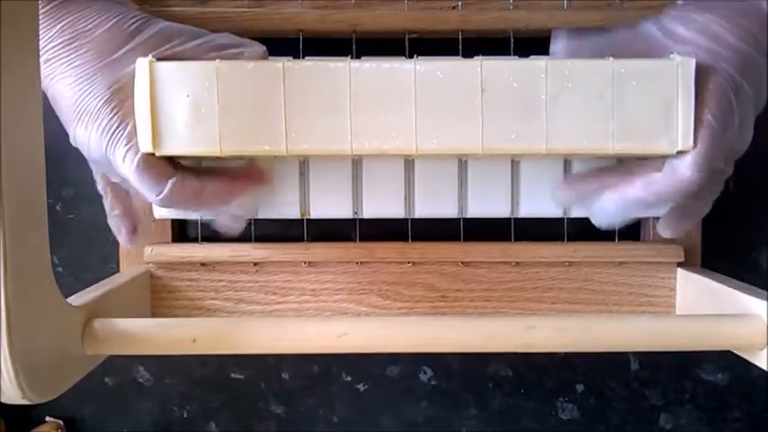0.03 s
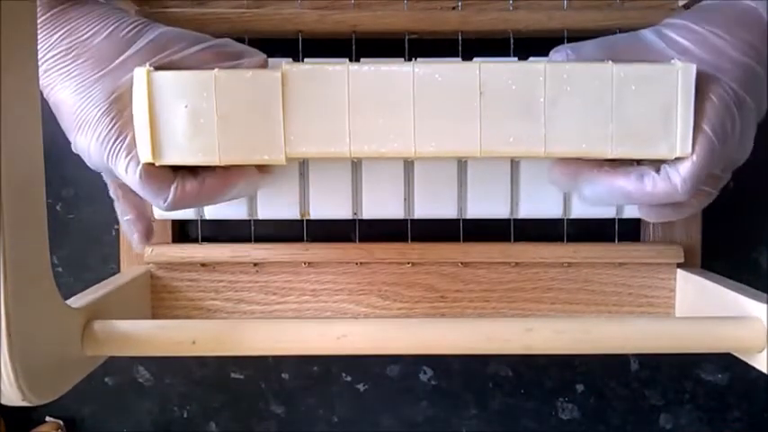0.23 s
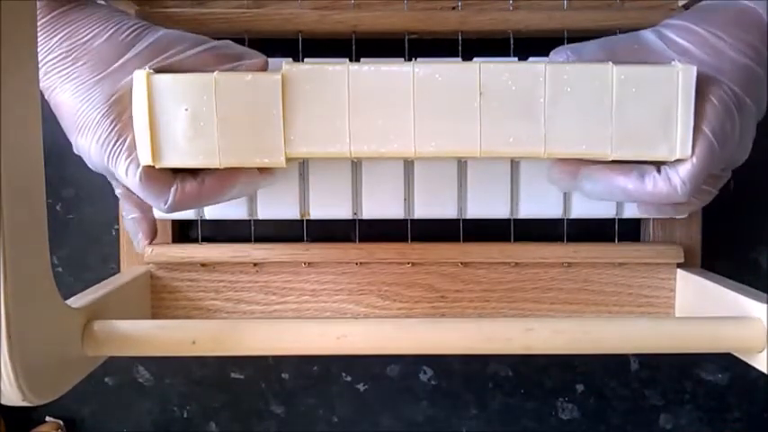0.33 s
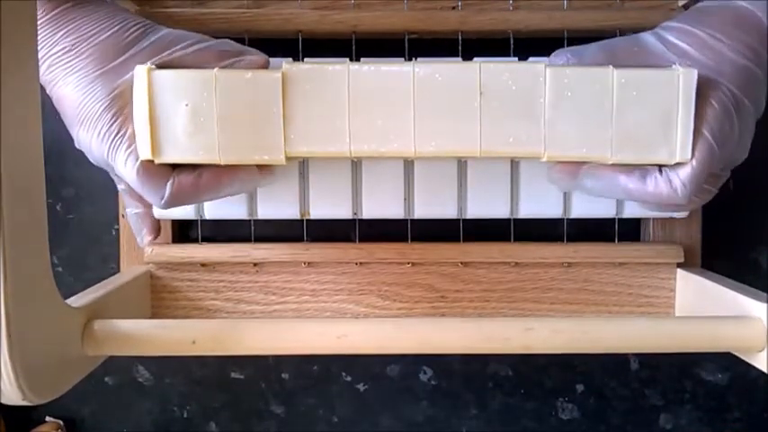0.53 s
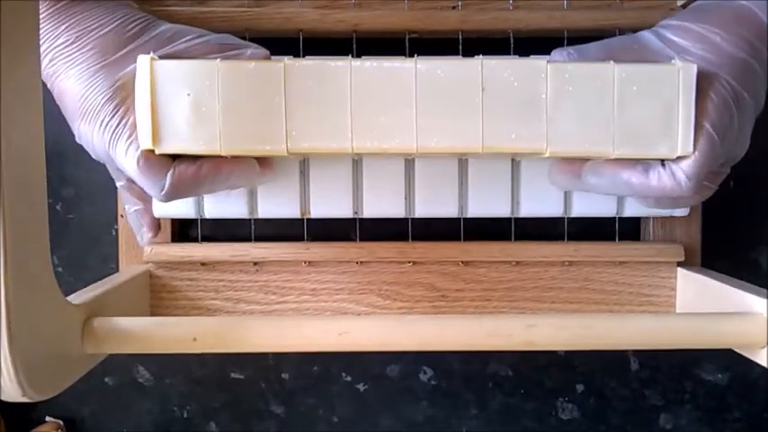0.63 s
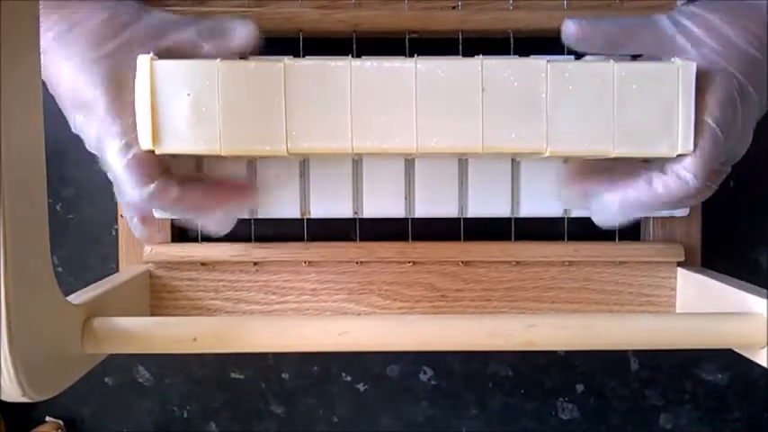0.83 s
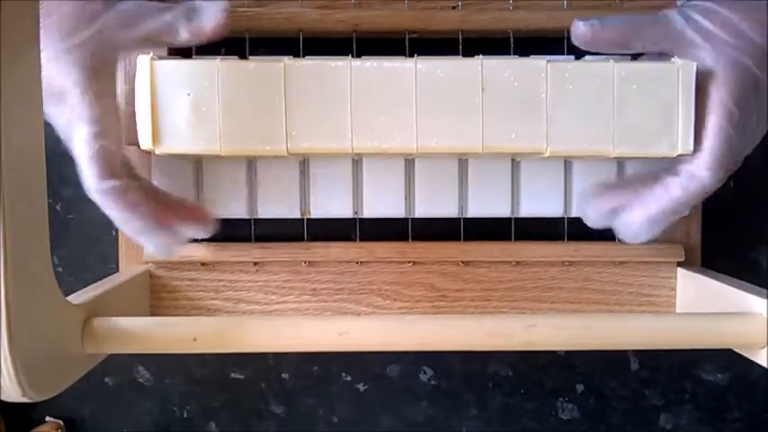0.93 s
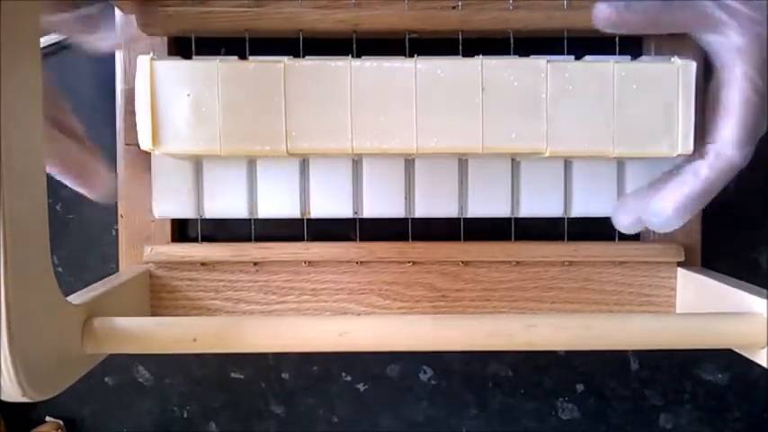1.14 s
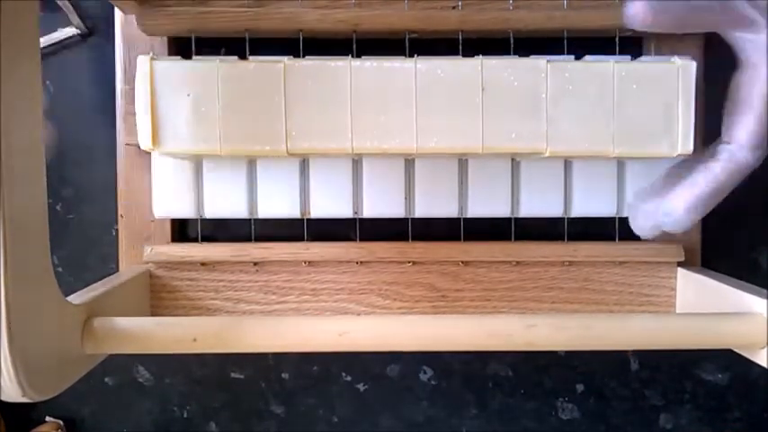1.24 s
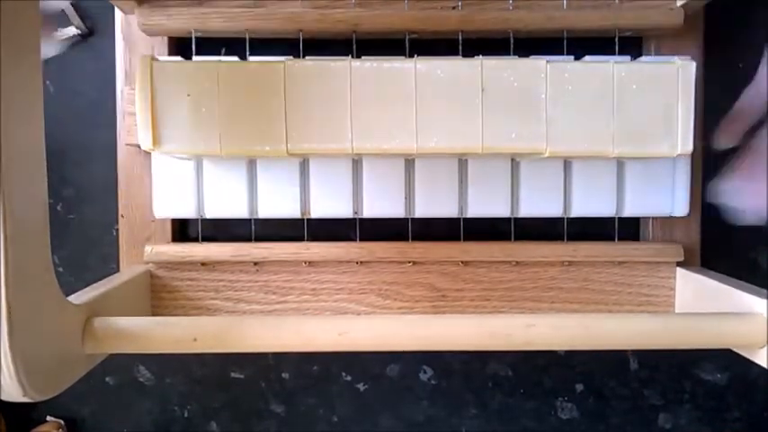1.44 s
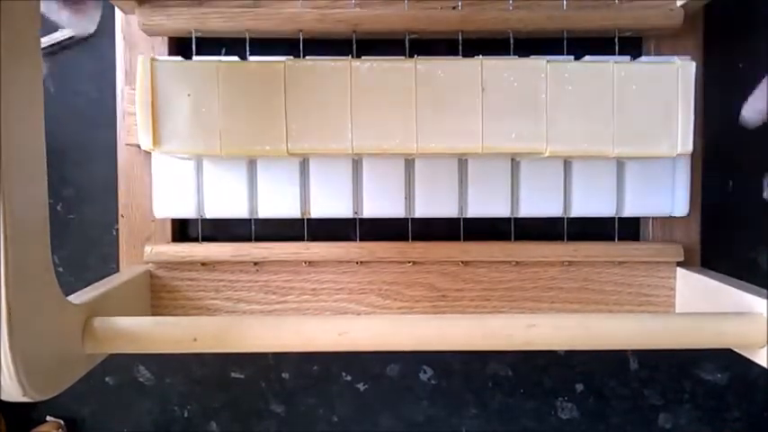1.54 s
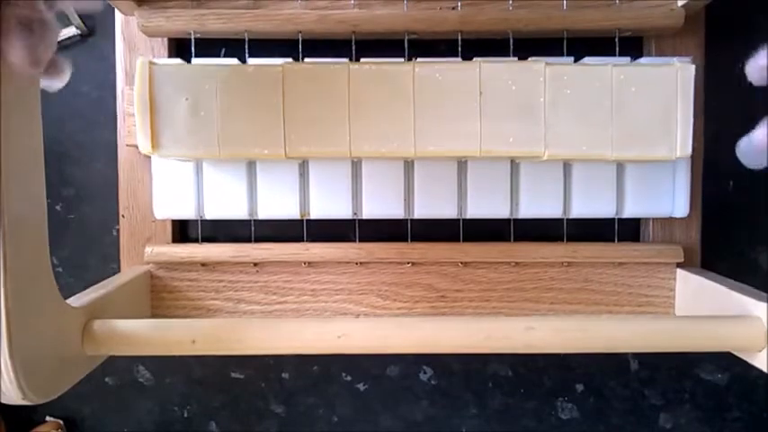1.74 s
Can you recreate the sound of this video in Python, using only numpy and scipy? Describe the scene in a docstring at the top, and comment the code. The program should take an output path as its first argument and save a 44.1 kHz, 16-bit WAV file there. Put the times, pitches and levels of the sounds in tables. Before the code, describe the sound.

A sharp clattering wooden knock as a soap block lands on a cutter, then faint gloved taps

```python
"""A small room, a wooden wire cutter close to the microphone: a log of soap is set down on it.
Gloves snap, then the soap lands with a clattering knock that rings the frame as decaying partials and
noise; a duller knock nudges it into place. Gloved fingers snap, rustle, squeak and tap as they let go:
shaped noise and short hollow rings. Soft low pushes rock the bench, arms swish back, and a faint hiss
and hum lie under it all."""
import sys
import numpy as np
from scipy import signal
from scipy.fft import rfft, irfft
from scipy.io import wavfile
from scipy.ndimage import uniform_filter1d

SR = 44100
rng = np.random.default_rng(int(sys.argv[2]) if len(sys.argv) > 2 else 0)


def unload_wav(signal):
    """Save mono or channel-first audio to the path in sys.argv[1] as 16-bit WAV at rate SR, clipped to [-1, 1]."""
    wavfile.write(
        sys.argv[1],
        SR,
        np.round(np.clip(np.atleast_2d(signal).T, -1, 1) * 32767).astype(np.int16),
    )


N = 79380
CLOCK = np.arange(N) / SR  # time through the scene [s]
RING_SIZE = SR // 2
RING_T = np.arange(RING_SIZE) / SR  # time since a contact [s]


def amp(db):
    """Turns decibels into gain."""
    return 10 ** (np.asarray(db) / 20)


def unit(x):
    """Scales a signal to rms 1."""
    return x / np.sqrt(np.mean(x ** 2) + 1e-20)


def read(points, hz):
    """Reads a (frequency, value) table along a log-frequency axis."""
    f, value = np.transpose(points)
    return np.interp(np.log(hz + 1), np.log(f), value)


def add(mix, start_s, sound):
    """Mixes a sound in at a given time."""
    part = mix[round(start_s * SR):][:len(sound)]
    part += sound[:len(part)]


def noise(colour, size):
    """Noise of rms 1: random phases under a given spectrum."""
    hz = np.fft.rfftfreq(size, 1 / SR)
    phases = np.exp(2j * np.pi * rng.random(len(hz)))
    return unit(irfft(phases * amp(read(colour, hz)), size))


def narrow(centre_hz, width, size):
    """Noise in one resonance, 6 dB down at about the given share of its pitch to either side."""
    hz = np.geomspace(20, SR / 2, 1000)
    level_db = -20 * np.log10(1 + (np.log(hz / centre_hz) / width) ** 2)
    return noise(np.c_[hz, level_db], size)


def fade(t60):
    """Exponential decay that falls 60 dB in t60 seconds."""
    return np.exp(-np.log(1000) * RING_T / t60)


def dying(x, ring):
    """Splits a sound into overlapping bands and lets each die at its own speed."""
    hz, spectrum = np.fft.rfftfreq(len(x), 1 / SR), rfft(x)
    centres, t60s = np.transpose(ring)
    out = np.zeros(len(x))
    for weights, t60 in zip(np.eye(len(ring)), t60s):
        band = irfft(spectrum * read(np.c_[centres, weights], hz), len(x))
        out += band * fade(t60)
    return out


def mode(hz, db, t60):
    """One resonance struck once: a sine that dies away."""
    return amp(db) * fade(t60) * np.sin(2 * np.pi * hz * RING_T)


def stroke(middle_s, spread_s, db):
    """The bell-shaped swell and fade of one sliding movement."""
    return amp(db) * np.exp(-.5 * ((CLOCK - middle_s) / spread_s) ** 2)


# Steady air of the room: (frequency [Hz], relative level [dB per Hz])
AIR_COLOUR = [(25, 2.5), (50, 4), (110, 3), (260, -7.5), (430, -3.5), (580, -5.5), (800, -10.5),
              (1500, -13.5), (2300, -12), (3500, -17), (5500, -16), (9000, -21.5), (15800, -24)]
# Faint hum: (frequency [Hz], peak level [dB])
HUM_TONES = [(99, -66.5), (170, -61)]
AIR_DB = -55.5


def background():
    """Steady room hiss as shaped noise, with a faint hum of sines."""
    hum = sum(amp(db) * np.sin(2 * np.pi * (hz * CLOCK + rng.random())) for hz, db in HUM_TONES)
    return amp(AIR_DB) * noise(AIR_COLOUR, N) + hum


RUSTLE_GRAIN_DB = 2  # rms swing of the friction's level


def rubbing(strokes, colour):
    """Friction: noise of fast, uneven level that swells and fades with each stroke."""
    swing = unit(uniform_filter1d(rng.standard_normal(N), size=60))
    grains = amp(RUSTLE_GRAIN_DB * swing)
    return sum(stroke(*row) for row in strokes) * unit(grains * noise(colour, N))


# Gloves sliding, close by: (middle [s], spread [s], level [dB])
GLOVE_SLIDES = [(0.046, 0.032, -50), (0.900, .016, -63), (0.942, 0.018, -64), (1.02, 0.17, -65),
                (1.70, .11, -61.5)]
# Colour of the rustle: (frequency [Hz], relative level [dB per Hz])
RUSTLE_COLOUR = [(300, -14), (1500, 3.5), (3200, -9.5), (4100, 3.5), (5400, 7.5), (7000, -6.5),
                 (9500, -18.5), (16000, -13)]


def slides():
    """Sliding gloves rustle as grainy friction noise."""
    return rubbing(GLOVE_SLIDES, RUSTLE_COLOUR)


# Gloves snapping off the soap: (time [s], level [dB], ring [Hz], ring level against the crack [dB])
GLOVE_SNAPS = [(0.02, -29.5, 6200, -8), (0.0211, -33, 5260, 2.5), (0.024, -36.5, 6300, -6),
               (0.9040, -45.5, 4020, 4), (0.9300, -50.5, 6680, 1.5), (0.9490, -51, 5160, 1.5),
               (1.4659, -45, 7630, 1.5)]
# Colour of a snap's crack: (frequency [Hz], relative level [dB per Hz])
SNAP_COLOUR = [(200, -18), (800, 1), (1500, -1), (2900, 7.5), (3300, -23), (4100, 13), (5300, -18),
               (6800, 13.5), (7600, -1.5), (9000, 3.5), (11000, -48), (16000, -38)]
SNAP_T60_S, SNAP_TOP_HZ = 0.011, 8900
SNAP_WIDTH = 0.02  # share of the ring's pitch


def snaps():
    """Glove film comes unstuck in tiny bright cracks, each with its own narrow ring."""
    out = np.zeros(N)
    for start_s, db, ring_hz, ring_db in GLOVE_SNAPS:
        crack = noise(SNAP_COLOUR, RING_SIZE)
        ring = amp(ring_db) * narrow(ring_hz, SNAP_WIDTH, RING_SIZE)
        add(out, start_s, amp(db) * (crack + ring) * fade(SNAP_T60_S))
    return signal.lfilter(*signal.butter(4, SNAP_TOP_HZ, fs=SR), out)


# Soft pushes of the hands that rock the bench: (time [s], level [dB], frequency [Hz])
BENCH_THUDS = [(0.074, -43, 57), (0.396, -56, 77), (0.77, -26.5, 52.8), (0.825, -31, 46.5),
               (0.898, -39, 46), (1.290, -42, 47), (1.637, -41.5, 51), (1.721, -49, 46.5)]
THUD_RISE_S = 0.011


def thuds():
    """The bench sways for a few low cycles under each push, swelling and then dying."""
    out = np.zeros(N)
    u = RING_T / THUD_RISE_S
    swell = u * np.exp(1 - u)  # peaks at 1 after the rise time
    for start_s, db, hz in BENCH_THUDS:
        add(out, start_s, amp(db) * swell * np.sin(2 * np.pi * hz * RING_T))
    return out


# Soap meeting the cutter, close to the microphone:
# (time [s], level [dB], hardness as low-pass corner [Hz], weight on the low modes [dB])
SOAP_KNOCKS = [(0.2118, -23, 6400, 7.5), (0.2148, -28.5, 7000, 9), (0.2233, -39, 3500, 11.5),
               (0.2300, -26.5, 1800, 4.5), (0.2387, -28.5, 4900, -27), (0.2443, -29, 700, -11),
               (0.2478, -34.5, 4000, -25), (0.2636, -29, 2640, 9), (0.2666, -30.5, 3060, 7),
               (0.2775, -41, 2400, -15), (0.2902, -32.5, 910, 4), (0.7636, -30.5, 394, -3),
               (0.7772, -29.5, 370, -25), (0.7877, -27, 377, -11), (0.7922, -33.5, 420, -7),
               (0.8057, -37.5, 610, -4), (0.8150, -35, 660, -6.5)]
# Modes of the loaded frame: (frequency [Hz], relative level [dB], t60 [s])
FRAME_MODES = [(77, -2.5, 0.25), (117.2, 4, 0.18), (133.8, 7, 0.23), (163, -6, 0.2), (194.4, 6.5, 0.11),
               (290, -38, 0.12), (399, -1.5, 0.14), (449, -11, 0.14), (606.7, -15, .2), (646.8, -9.5, 0.33),
               (1078.4, -13, 0.15), (1583, -26.5, 0.28), (2031, -29, .22), (2850, -27, 0.11)]
# Dense upper resonances of the wood: (frequency [Hz], relative level [dB per Hz])
WOOD_COLOUR = [(130, -5), (230, 4.5), (320, 3.5), (430, 3.5), (530, -0.5), (660, 3.5), (820, 0),
               (1200, -0.5), (2700, -5.5), (3250, -13.5), (3900, -4), (4500, -16), (5300, -11.5),
               (6200, -21), (9500, -35), (16000, -47)]
# How long the wood rings: (frequency [Hz], t60 [s])
WOOD_DECAY = [(100, 0.11), (500, 0.19), (2000, 0.16), (4500, 0.14), (9000, 0.13)]
# First crack of a contact: (frequency [Hz], relative level [dB per Hz])
CRACK_COLOUR = [(200, 10), (430, 9.5), (600, 3), (1200, -2), (3200, 2), (4200, 0.5), (5500, 1), (6400, -10),
                (9500, -31), (16000, -44)]
LOW_MODES_HZ, BASS_CUT_HZ = 260, 66
MODES_DB, GRAIN_DB, CRACK_DB, CRACK_T60_S = -4.5, -4.5, -1, 0.011
SHARED_GRAIN = 0.32  # share (by power) of the wood's ring that is the same at every contact


def knocks():
    """Each contact cracks, then rings the frame and the grain of the wood; softer ones lose treble."""
    out = np.zeros(N)
    shared_wood = np.sqrt(SHARED_GRAIN) * noise(WOOD_COLOUR, RING_SIZE)
    for start_s, db, hard_hz, weight_db in SOAP_KNOCKS:
        frame = np.zeros(RING_SIZE)
        for k, (hz, level_db, t60) in enumerate(FRAME_MODES):
            sign = (-1) ** k  # neighbouring modes start in opposite directions
            frame += sign * mode(hz, level_db + weight_db * (hz < LOW_MODES_HZ), t60)
        own_wood = np.sqrt(1 - SHARED_GRAIN) * noise(WOOD_COLOUR, RING_SIZE)
        grain = dying(shared_wood + own_wood, WOOD_DECAY)
        crack = noise(CRACK_COLOUR, RING_SIZE) * fade(CRACK_T60_S)
        contact = amp(MODES_DB) * frame + amp(GRAIN_DB) * grain + amp(CRACK_DB) * crack
        soften = signal.butter(2, hard_hz, fs=SR)
        add(out, start_s, amp(db) * signal.lfilter(*soften, contact))
    return signal.lfilter(*signal.butter(2, BASS_CUT_HZ, "high", fs=SR), out)


# Brief squeaks of soap and glove: (middle [s], spread [s], level [dB], frequency [Hz])
GLOVE_SQUEAKS = [(0.791, 0.003, -52, 2020), (0.798, 0.014, -57, 2800), (0.894, 0.0053, -54.5, 3990),
                 (0.942, 0.0045, -59, 8300), (0.952, 0.011, -61, 5200)]
SQUEAK_WIDTH = 0.06  # share of the squeak's pitch


def squeaks():
    """Sticking and slipping, heard as brief swells of narrow-band noise."""
    out = np.zeros(N)
    for middle_s, spread_s, db, hz in GLOVE_SQUEAKS:
        out += stroke(middle_s, spread_s, db) * narrow(hz, SQUEAK_WIDTH, N)
    return out


# Arms drawing back: (middle [s], spread [s], level [dB])
ARM_SWISHES = [(0.95, 0.049, -53), (1.12, 0.08, -61.5), (1.50, .09, -58), (1.68, 0.037, -62.5)]
# Colour of the swish: (frequency [Hz], relative level [dB per Hz])
SWISH_COLOUR = [(80, 5), (500, 12.5), (900, 1), (2300, 5.5), (3500, -1), (7000, -5), (16000, -46)]


def swishes():
    """Arms drawing back swish as grainy friction noise."""
    return rubbing(ARM_SWISHES, SWISH_COLOUR)


# Fingertips tapping the soap: (time [s], level [dB])
FINGER_TAPS = [(0.9040, -42.5), (0.9295, -39), (0.9485, -40), (0.9848, -29.5), (0.9902, -40), (1.0012, -38),
               (1.0105, -44.5)]
# Hollow ring of a tap: (frequency [Hz], relative level [dB], t60 [s])
TAP_RING = [(464, -4.5, 0.044), (580, 5, 0.014), (660, -0.5, 0.025), (776, -17.5, 0.026),
            (1437, -2.5, 0.016), (1970, -12.5, .022), (2790, -19, .02)]
TAP_RISE_S = 0.00096


def taps():
    """Fingertips give a short hollow ring of a few modes with a softened onset."""
    out = np.zeros(N)
    onset = 1 - np.exp(-RING_T / TAP_RISE_S)
    ring = onset * sum(mode(*row) for row in TAP_RING)
    for start_s, db in FINGER_TAPS:
        add(out, start_s, amp(db) * ring)
    return out


# How long the small room rings: (frequency [Hz], t60 [s])
ROOM_DECAY = [(100, 0.29), (1000, 0.17), (5000, 0.3), (12000, 0.088)]


def room(x):
    """A short diffuse tail of sparse random reflections, each band dying at its own speed."""
    sparse = rng.random(RING_SIZE) < .1
    late = RING_T > .003  # the first reflection comes after 3 ms
    tail = dying(rng.standard_normal(RING_SIZE) * sparse * late, ROOM_DECAY)
    return signal.fftconvolve(x, tail / np.linalg.norm(tail))[:N]


KNOCK_ROOM_DB, TAP_ROOM_DB, GLOVE_ROOM_DB = -17, -9.5, -7  # sends into the room


def scene():
    """All sources at one microphone, with the room's answer to knocks, taps and gloves."""
    glove = snaps() + squeaks()
    knock = knocks()
    tap = taps()
    send = amp(KNOCK_ROOM_DB) * knock + amp(TAP_ROOM_DB) * tap + amp(GLOVE_ROOM_DB) * glove
    contacts = knock + tap + glove + room(send)
    movements = slides() + thuds() + swishes()
    return (background() + contacts + movements)[None]


# Brief dips in the treble: (middle [s], half length [s], share lost [0-1])
TREBLE_DIPS = [(0.102, 0.0072, 0.47), (1.317, 0.0073, 0.75), (1.637, 0.0076, 0.75), (1.682, 0.0059, 0.36)]
DIP_ABOVE_HZ, EDGE_HZ = 750, 15900


def record(dry):
    """The treble dips briefly a few times; then a steep low-pass limits the band."""
    low_pass = signal.butter(2, DIP_ABOVE_HZ, fs=SR, output="sos")
    treble = dry - signal.sosfiltfilt(low_pass, dry)
    # the fourth power gives each dip a flat floor
    lost = sum(share * np.exp(-((CLOCK - s) / half) ** 4) for s, half, share in TREBLE_DIPS)
    band_limit = signal.firwin(511, EDGE_HZ, window=("kaiser", 9), fs=SR)
    return signal.oaconvolve(dry - lost * treble, band_limit[None], "same")


dry = scene()
out = record(dry)
unload_wav(out)
```